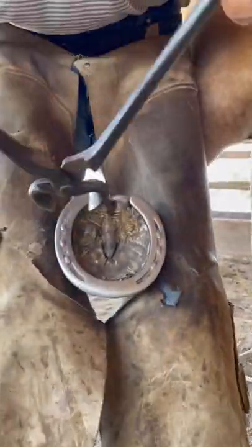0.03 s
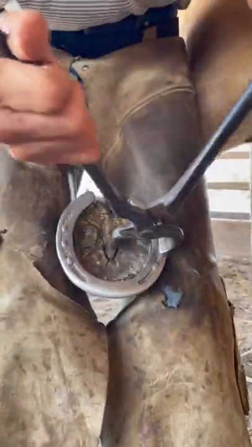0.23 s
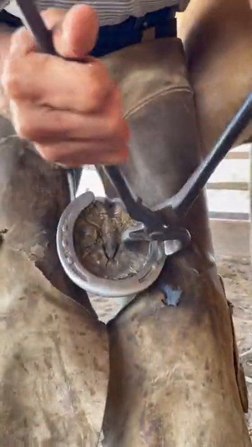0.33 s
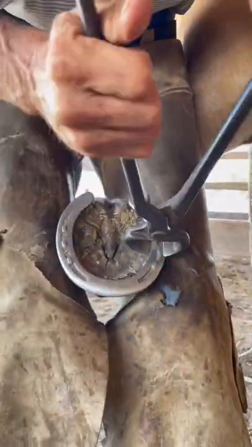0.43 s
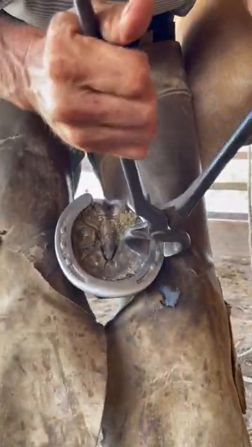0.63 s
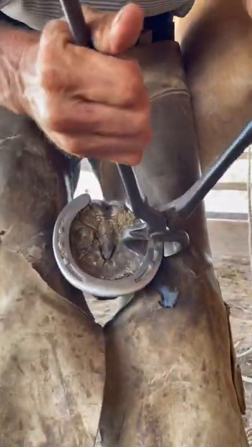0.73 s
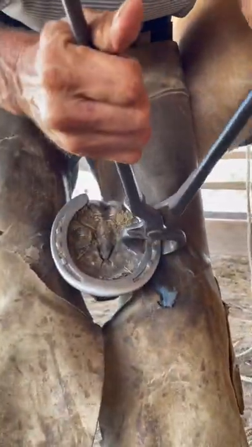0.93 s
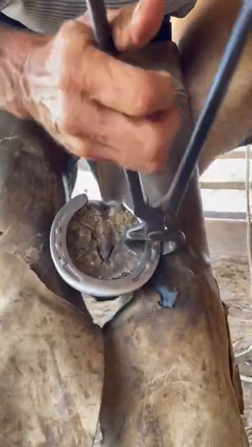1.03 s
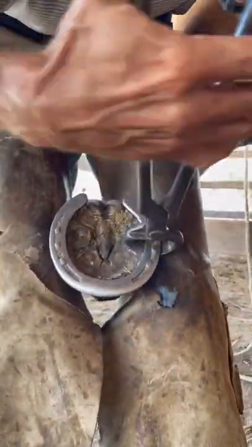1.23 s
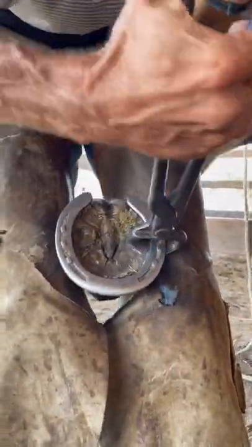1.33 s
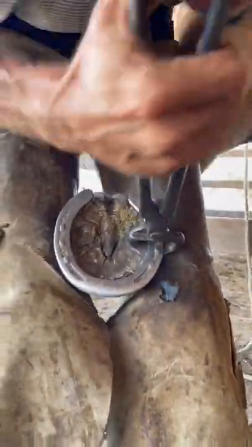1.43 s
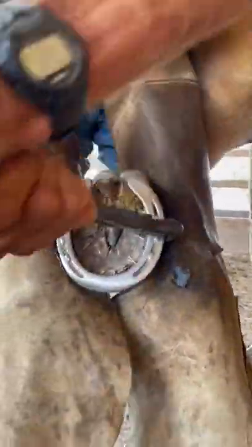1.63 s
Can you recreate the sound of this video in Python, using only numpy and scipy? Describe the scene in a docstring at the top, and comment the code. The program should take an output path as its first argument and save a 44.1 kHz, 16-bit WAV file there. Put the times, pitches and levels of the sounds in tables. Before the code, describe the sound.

A steel pick works on a shod hoof, close by. It scrapes packed dirt as a faint ring fades, then knocks sharply on the shoe at 0.2 seconds, with two lighter clinks by 0.4. Weak taps and gritty scrapes follow from 0.7, joined by soft, dull rubbing around 1 second. Dry dirt snaps off brightly near 1.5 seconds. A low, steady barn rumble lies underneath.

```python
"""A steel hoof tool works on a shod hoof, close by, over the low steady background of a barn. At the start a
faint metallic ring dies away over a faint gritty rustle. From 0.2 s it knocks against the shoe: shoe and tool
ring, the hoof thuds. The knocks weaken, and from about 1 s dull drags join the scraping. Dirt snaps off in
crumbs, loudest near 1.5 s. The barn adds a light tail to the work."""
import sys
import numpy as np
from scipy import signal
from scipy.fft import rfft, irfft
from scipy.io import wavfile
from scipy.ndimage import uniform_filter1d

SR = 44100
rng = np.random.default_rng(int(sys.argv[2]) if len(sys.argv) > 2 else 0)


def unload_audio(sound):
    """Save the sound as a 16-bit wav file, at the path given as the first command line argument."""
    columns = np.transpose(np.atleast_2d(sound))
    # keep every value between -1 and 1, then stretch to whole-number steps
    steps = np.round(np.clip(columns, -1, 1) * 32767)
    wavfile.write(sys.argv[1], SR, steps.astype(np.int16))


N = 74970


def amp(db):
    """Decibels to gain."""
    return 10 ** (np.asarray(db) / 20)


def unit(x):
    """Scales to rms 1."""
    return x / np.sqrt(np.mean(x ** 2) + 1e-20)


def read(points, hz):
    """Interpolates a table on a log-frequency axis."""
    points_hz, values = np.transpose(points)
    return np.interp(np.log(hz + 1), np.log(points_hz + 1), values)


def add(mix, start_s, sound):
    """Mixes a sound in at start_s."""
    part = mix[..., round(start_s * SR):][..., :sound.shape[-1]]
    part += sound[..., :part.shape[-1]]


def bins(size):
    """FFT bin frequencies in Hz."""
    return np.fft.rfftfreq(size, 1 / SR)


def hump(centre_hz, octaves, skirt_db):
    """Bell-shaped spectrum with skirts, as rows of Hz, dB."""
    hz = np.geomspace(40, 20000, 80)
    away = np.log2(hz / centre_hz) / octaves
    gain = np.exp(-away ** 2 / 2) + amp(skirt_db) / (1 + (away / 2) ** 2)
    return np.c_[hz, 20 * np.log10(gain)]


# Each row: resonance in Hz, relative level in dB.
LINGER_PEAKS = [(842, 6), (1330, 0.5), (2030, -4)]

def lingering_ring(level_db=-47.5, t60_s=1.55, half_width_hz=65):
    """Metal still rings from an earlier blow: a diffuse, wavering tail."""
    hz = bins(N)
    colour = sum(amp(db) / (1 + ((hz - peak_hz) / half_width_hz) ** 2) for peak_hz, db in LINGER_PEAKS)
    tail = unit(irfft(colour * np.exp(2j * np.pi * rng.random(len(hz))), N))
    return tail * amp(level_db - 60 * np.arange(N) / SR / t60_s)


def slips(colour, rate_per_s=4500, spread_db=4.2, clump_db=2.3, clump_s=0.007):
    """Friction: a dense train of tiny slips of uneven size, in clumps."""
    clumps = unit(uniform_filter1d(rng.standard_normal(N), round(clump_s * SR)))
    size_db = clump_db * clumps + spread_db * np.minimum(rng.exponential(1, N), 4)
    train = amp(size_db) * rng.choice([-1, 1], N) * (rng.random(N) < rate_per_s / SR)
    return unit(irfft(rfft(train) * amp(read(colour, bins(N))), N))


# Each row: start in seconds, length in seconds, grit level in dB, dust level in dB.
SCRAPE_STROKES = [(0.0, 0.58, -58, -62), (0.2068, 0.007, -35, -63), (0.379, 0.0063, -47.5, -48),
                  (0.672, 0.058, -47, -50), (0.793, 0.014, -42.5, -48), (0.931, .11, -58.5, -55.5),
                  (1.064, 0.263, -66, -55), (1.284, 0.026, -55, -48), (1.352, 0.32, -53, -57)]
# Friction spectra. Each row: frequency in Hz, relative level in dB.
GRIT_SPECTRUM = [(300, 9), (1200, -10), (2100, -1), (6500, 0), (9500, -44), (16000, -3.5)]
DUST_SPECTRUM = [(1000, -22), (4500, -15), (7000, -5.5), (10000, -10.5), (16000, -12)]

def scraping(attack_share=0.081, release_s=0.0065):
    """The tool drags through coarse grit and fine dust, and a faint gritty rustle runs under the opening; the
    shortest strokes lead into knocks."""
    t = np.arange(N) / SR
    grit_power, dust_power = np.zeros((2, N))
    for start_s, length_s, grit_db, dust_db in SCRAPE_STROKES:
        attack = np.clip((t - start_s) / (attack_share * length_s), 0, 1)
        envelope = attack * np.exp(-np.maximum(t - start_s - length_s, 0) / release_s)
        grit_power += (amp(grit_db) * envelope) ** 2
        dust_power += (amp(dust_db) * envelope) ** 2
    return np.sqrt(grit_power) * slips(GRIT_SPECTRUM) + np.sqrt(dust_power) * slips(DUST_SPECTRUM)


# Each row: frequency in Hz, left-right coherence (clipped to -1..1 in use).
COHERENCE = [(60, 1), (290, 0.74), (640, -0.088), (1500, 0.92), (7000, 0.13), (10000, -2.04), (15000, 1)]

def diffuse_noise(size, colour):
    """Noise from all around: left and right are partly alike."""
    hz = bins(size)
    coherence = np.clip(read(COHERENCE, hz), -1, 1)
    mid, side = rfft(rng.standard_normal((2, size)))
    mid *= np.sqrt((1 + coherence) / 2)
    side *= np.sqrt((1 - coherence) / 2)
    return irfft(np.array([mid + side, mid - side]) * amp(read(colour, hz)), size)


# Each row: frequency in Hz, relative level in dB.
BACKGROUND_SPECTRUM = [(20, -44), (58, 2), (110, -2), (600, -13), (2500, -25.5), (6000, -26),
                       (15500, -28.5), (16500, -68)]

def background(level_db=-54, waver_db=0.86):
    """Low rumble and faint hiss of the barn, wavering a little."""
    t = np.arange(N) / SR
    waver = sum(np.sin(2 * np.pi * (hz * t + rng.random())) / np.sqrt(hz)
                for hz in np.geomspace(2, 25, 20))
    return amp(level_db - waver_db * unit(waver)) * unit(diffuse_noise(N, BACKGROUND_SPECTRUM))


def burst(colour, hold_s, rise_s, t60_s):
    """Crowded, quickly dying vibrations of one contact."""
    size = 8192
    t = np.arange(size) / SR
    noise = irfft(amp(read(colour, bins(size))) * np.exp(2j * np.pi * rng.random(size // 2 + 1)))
    envelope = np.minimum(t / rise_s, 1) * amp(-60 * np.maximum(t - hold_s, 0) / t60_s)
    return unit(noise * envelope) * np.sqrt(np.mean(envelope ** 2))


# Each row: start in seconds, level in dB, centre in Hz, width in octaves. The row at 1.0972 s is the lower
# clack that opens the knock at 1.1 s.
SHORT_CLICKS = [(0.1314, -38.5, 3080, 0.031), (0.3224, -38.5, 3500, 0.37), (0.9624, -46, 3640, 0.13),
                (0.993, -41, 3500, 0.47), (1.0972, -55, 1700, 0.28), (1.451, -31, 9450, 1.2),
                (1.464, -38, 5000, 2.5), (1.4793, -19.5, 10500, 1.16), (1.5092, -33, 7550, 3)]

def snaps():
    """Dry crumbs break away with short bright clicks; one lower click opens the knock at 1.1 s."""
    out = np.zeros(N)
    for start_s, db, centre_hz, octaves in SHORT_CLICKS:
        colour = hump(centre_hz, octaves, skirt_db=-6.5)
        add(out, start_s, amp(db) * burst(colour, hold_s=0.00058, rise_s=0.00071, t60_s=0.021))
    return out


def ring(modes, rise_s):
    """Struck modes, each with its own decay."""
    t = np.arange(SR // 2) / SR
    partials = sum(amp(db - 60 * t / t60_s) * np.sin(2 * np.pi * (hz * t + rng.random()))
                   for hz, db, t60_s in modes)
    return (1 - np.exp(-t / rise_s)) * partials


# Each row: frequency in Hz, relative level in dB, T60 in seconds.
SHOE_MODES = [(674, 0.5, 0.074), (1168, 2.5, 0.029), (1906, -1, 0.045), (2226, 5, 0.013), (3210, 3, 0.063),
              (4600, 2, 0.058), (5685, 11, 0.038), (6510, 4.5, 0.046), (7806, 2.5, 0.044),
              (8600, 1.5, 0.064), (9190, 4, 0.044), (11000, 15.5, 0.0072), (16400, -11, 0.015),
              (4530, -34.5, 1)]
TOOL_MODES = [(1969, -0.5, 0.041), (2724, -8.5, 0.041), (3543, 7.5, 0.016), (4516, -8, 0.039),
              (5910, -4, 0.032)]
HOOF_MODES = [(84.5, -22, 0.057), (121, -3, 0.063), (189.7, 5.5, 0.046), (237.4, 4.5, 0.049),
              (356, 4, 0.0408), (519.6, -5, 0.059)]
# Each row: frequency in Hz, relative level in dB.
CRACK_SPECTRUM = [(150, -1.5), (2200, -2), (4000, -2.5), (6000, -4.5), (10000, 3.5), (12500, -12),
                  (15500, -9), (17000, -35)]
# Each row: start in seconds, shoe, tool, crack and clack levels in dB, clack centre in Hz,
# clack width in octaves, thud level in dB, contact length in seconds.
TOOL_KNOCKS = [(0.2144, -20, -24.5, -12, -16.5, 1000, 0.32, -23.5, 0.0026),
               (0.3313, -36, -17, -29.5, -26, 3400, 0.54, -47, 0.0058),
               (0.3886, -39, -31, -29.5, -20, 1530, 1, -32.5, 0.0008),
               (0.7974, -42, -49, -45, -35.5, 2860, 0.04, -38, 0.0027),
               (0.8960, -61.5, -78, -63, -35.5, 850, 0.73, -40.5, 0.0041),
               (0.9253, -83, -50.5, -52.5, -47.5, 600, 0.65, -39, 0.013),
               (1.0964, -85, -96, -71, -44.5, 372, 0.28, -44, 0.0026)]

def knocks(rise_s=0.00064):
    """Steel meets steel or horn: ringing metal, crack, tick, a clack coloured by the spot, a thud."""
    out = np.zeros(N)
    tick_colour = hump(centre_hz=12600, octaves=0.65, skirt_db=-33)
    for start_s, shoe_db, tool_db, crack_db, clack_db, hz, octaves, thud_db, contact_s in TOOL_KNOCKS:
        metal = amp(shoe_db) * ring(SHOE_MODES, rise_s) + amp(tool_db) * ring(TOOL_MODES, rise_s)
        crack = amp(crack_db) * burst(CRACK_SPECTRUM, contact_s, rise_s, t60_s=0.026)
        tick = amp(crack_db) * burst(tick_colour, hold_s=0.00049, rise_s=rise_s, t60_s=0.0071)
        clack = amp(clack_db) * burst(hump(hz, octaves, skirt_db=-43), contact_s, rise_s, t60_s=0.023)
        thud = amp(thud_db) * ring(HOOF_MODES, rise_s=0.0037)
        for part in (metal, crack, tick, clack, thud):
            add(out, start_s, part)
    return out


# Each row: start in seconds, length in seconds, level in dB, centre in Hz, width in octaves.
DULL_DRAGS = [(0.954, 0.09, -50, 2670, 1.4), (1.18, 0.034, -49, 564, 2.14), (1.16, 0.133, -51.5, 78, 0.75),
              (1.286, 0.027, -53.5, 880, 1.17), (1.389, 0.058, -53.5, 860, 0.42),
              (1.521, 0.061, -51, 745, 0.48)]

def drags():
    """Hand, tool and leather rub the hoof: slips in one broad resonance swell and fade."""
    out = np.zeros(N)
    for start_s, length_s, db, centre_hz, octaves in DULL_DRAGS:
        swell = np.sin(np.linspace(0, np.pi, round(length_s * SR)))
        friction = slips(hump(centre_hz, octaves, skirt_db=-20))[:len(swell)]
        add(out, start_s, amp(db) * swell * unit(friction))
    return out


# Each row: frequency in Hz, phase lead of the left in radians.
LEFT_LEAD_RAD = [(200, 0), (1550, 0.5), (3300, 0.4), (5100, 1.58), (7600, 1), (9200, 3.5), (11000, 3),
                 (12500, 5.5), (14200, 8)]
# Each row: frequency in Hz, left minus right in dB.
BALANCE_DB = [(2400, -.3), (3500, -2.8), (4600, 0.5), (8000, 0.15)]

def microphone_ports(x):
    """Close sound reaches the two ports with different phase and level."""
    hz = bins(N)
    left = amp(read(BALANCE_DB, hz) / 2)
    right = np.exp(-1j * read(LEFT_LEAD_RAD, hz)) / left
    return irfft(rfft(x) * np.array([left, right]), N)


# Each row: frequency in Hz, T60 in seconds.
TAIL_T60_S = [(400, 0.59), (5000, 0.14), (14000, 0.31)]
# Each row: frequency in Hz, relative level in dB.
TAIL_SPECTRUM = [(100, -12.5), (450, 8.5), (1200, -9.5), (5000, 4.5), (14000, -23)]

def barn_reverb(x, near_db=-19, near_t60_s=0.12, tail_db=-22.5):
    """Quick reflections from legs and floor, then the tail of the barn."""
    noise = diffuse_noise(SR, [(20, 0), (20000, 0)])
    hz, frame_s, spectra = signal.stft(noise, SR, nperseg=256)
    spectra *= amp(read(TAIL_SPECTRUM, hz)[:, None] - 60 * frame_s / read(TAIL_T60_S, hz)[:, None])
    t = np.arange(SR) / SR
    tail = signal.istft(spectra, SR, nperseg=256)[1][:, :SR] * np.minimum(t / 0.015, 1)
    near = noise[:, ::-1] * amp(-60 * t / near_t60_s) * np.minimum(t / 0.0082, 1)
    response = (amp(tail_db) * unit(tail) + amp(near_db) * unit(near)) / np.sqrt(SR)
    return signal.fftconvolve(x[None], response, axes=1)[:, :N]


def scene():
    """Close work on the hoof, its reflections and the background."""
    work = knocks() + snaps() + scraping() + drags() + lingering_ring()
    return microphone_ports(work) + barn_reverb(work) + background()


def record(dry):
    """Soft clip, then low-pass at 16.4 kHz."""
    lowpass = signal.firwin(255, 16400, window=("kaiser", 8), fs=SR)
    return signal.oaconvolve(np.tanh(dry), lowpass[None], "same")


dry = scene()
out = record(dry)
unload_audio(out)
```